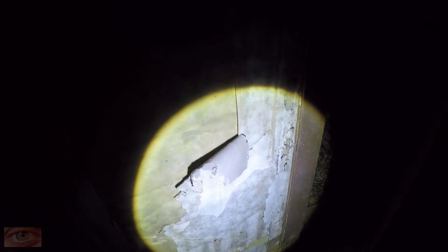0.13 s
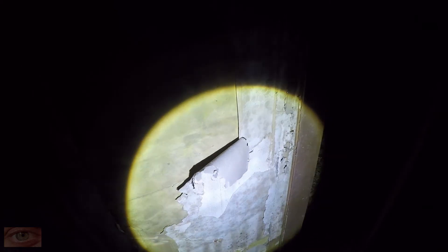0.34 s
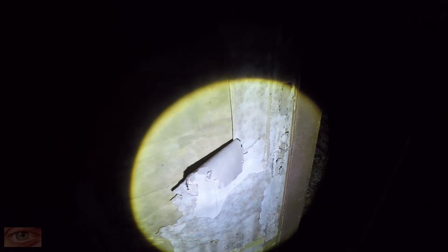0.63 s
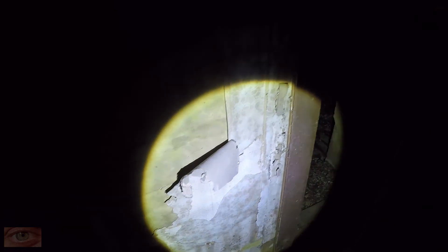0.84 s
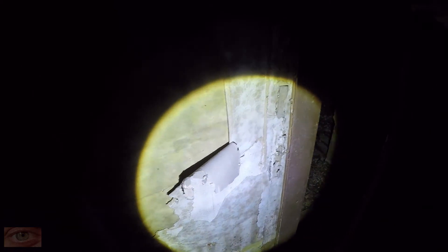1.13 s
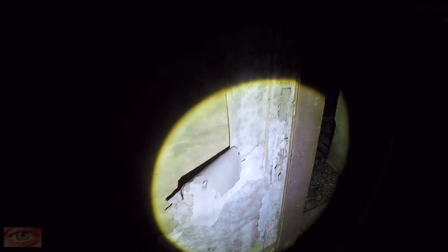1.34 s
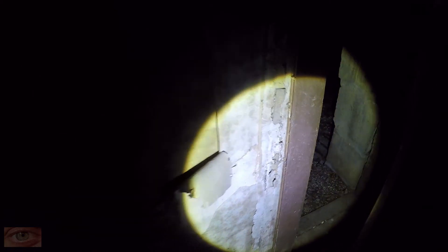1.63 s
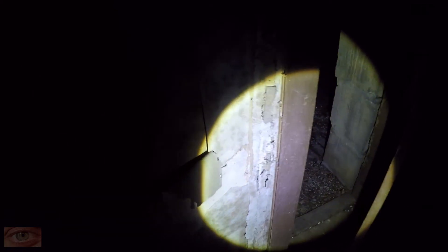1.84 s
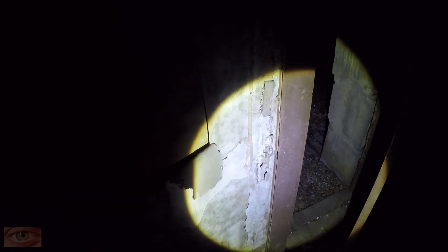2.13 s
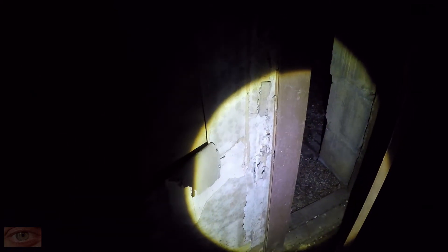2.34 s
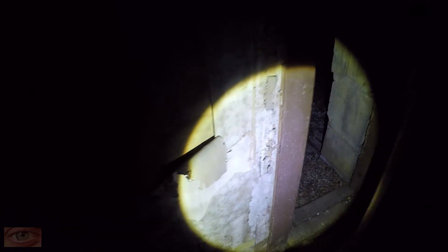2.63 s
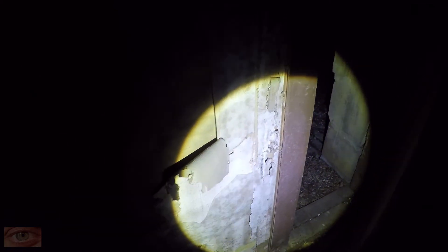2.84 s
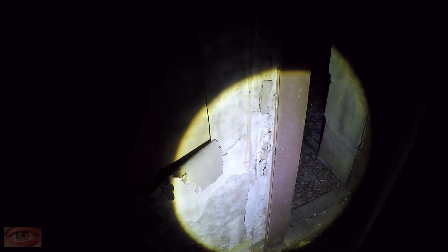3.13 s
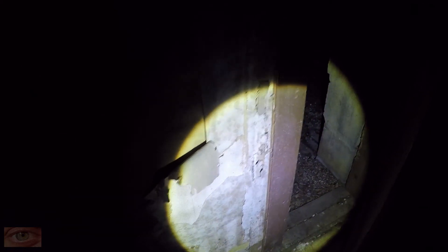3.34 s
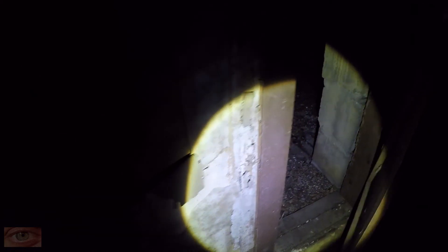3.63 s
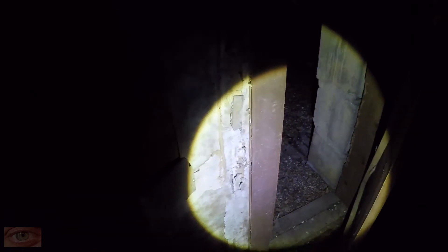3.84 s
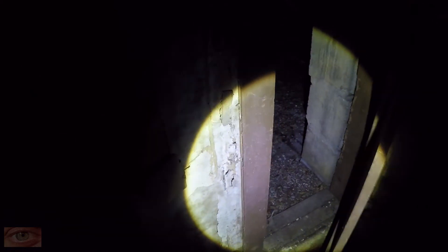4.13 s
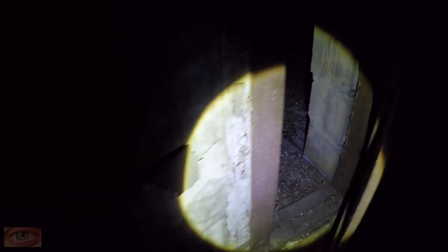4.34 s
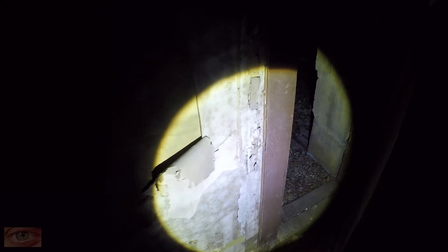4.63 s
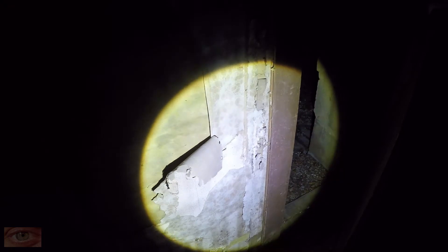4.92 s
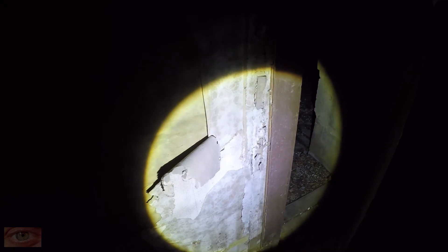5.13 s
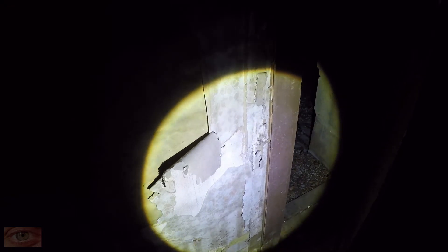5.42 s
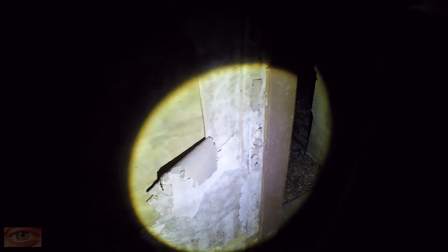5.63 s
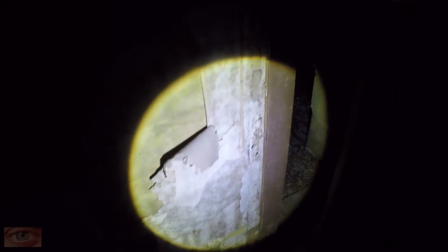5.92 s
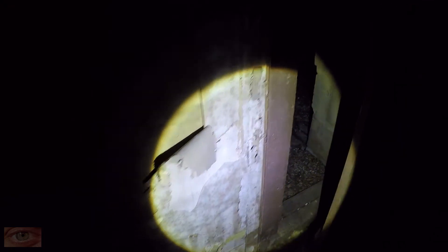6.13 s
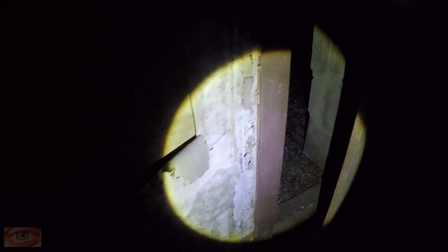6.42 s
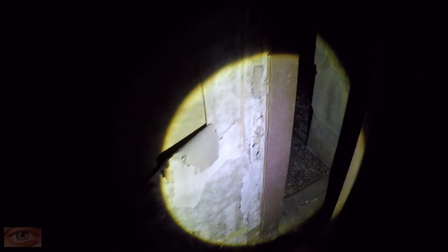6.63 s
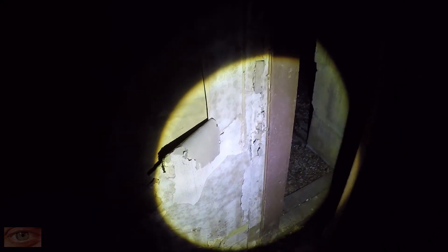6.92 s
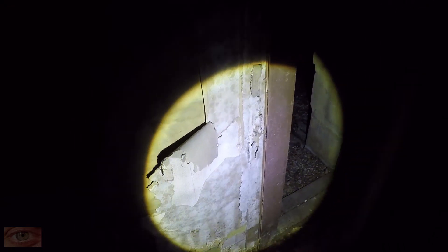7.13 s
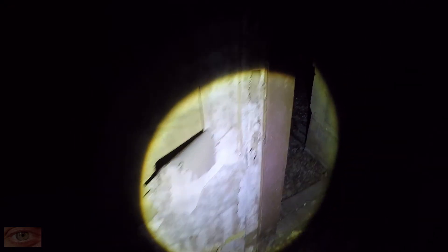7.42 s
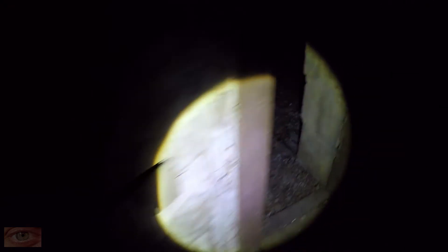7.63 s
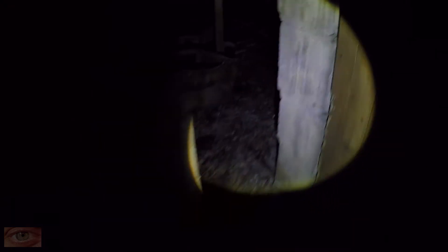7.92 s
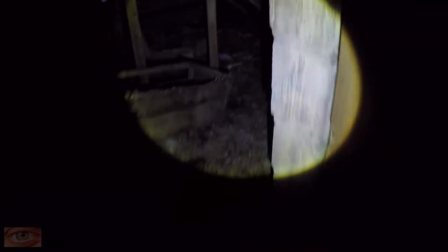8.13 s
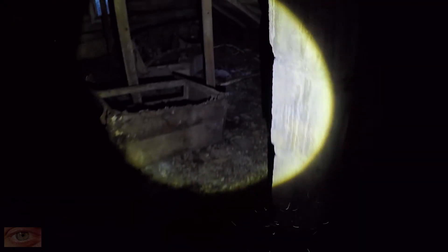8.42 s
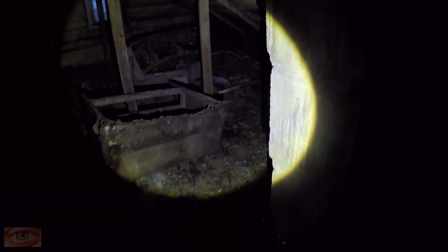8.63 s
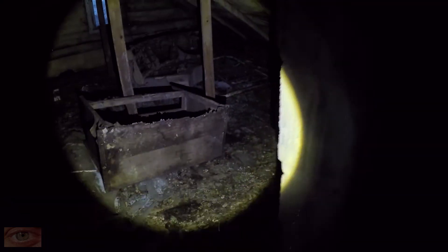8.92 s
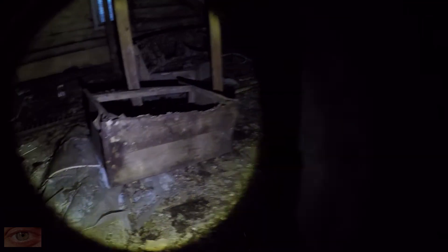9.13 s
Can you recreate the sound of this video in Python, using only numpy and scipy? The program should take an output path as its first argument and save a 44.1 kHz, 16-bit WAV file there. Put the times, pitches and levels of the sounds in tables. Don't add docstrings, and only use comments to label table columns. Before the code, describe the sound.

Close, heavy shoves boom through a jammed wooden door and floor, wood cracks and scrapes, then a last knock gives way to stillness.

```python
import sys
import numpy as np
from scipy import signal
from scipy.fft import rfft, irfft
from scipy.io import wavfile
from scipy.ndimage import uniform_filter1d

SR = 44100
rng = np.random.default_rng(int(sys.argv[2]) if len(sys.argv) > 2 else 0)


def dump(signal):
    limited = np.clip(np.atleast_2d(signal).T, -1, 1)
    pcm = np.round(limited * 32767).astype(np.int16)
    wavfile.write(sys.argv[1], SR, pcm)


def rack_gain(trim_db):
    fader = np.asarray(trim_db, float)
    return 10 ** (fader / 20)


N = 409228
FADE = np.log(1000)


def colour(x, points):
    hz, db = np.transpose(points)
    f = np.maximum(np.fft.rfftfreq(len(x), 1 / SR), 1)
    gain_db = np.interp(np.log(f), np.log(hz), db, left=-80, right=-80)
    y = irfft(rfft(x) * rack_gain(gain_db), len(x))
    return y / np.std(y)


def peak(x):
    return x / np.abs(x).max()


def add(out, s, x):
    i = int(s * SR)
    out[i:i + len(x)] += x[:N - i]


def ring(hz, t60, t):
    return np.sin(2 * np.pi * hz * t) * np.exp(-FADE * t / t60)


def body(modes, weight, weight_db, detune, detune_share, t):
    return sum(rack_gain(db + weight_db * w) * ring(hz * (1 + detune_share * e), t60, t)
               for (hz, db, t60), w, e in zip(modes, weight, detune))


def walk(rate):
    k = int(SR / rate)
    return uniform_filter1d(np.repeat(rng.standard_normal(N // k + 1), k), k)[:N]


def grains(size, rate, spread_db):
    hit = rng.random(size) < rate / SR
    strength = rack_gain(spread_db * np.minimum(rng.exponential(size=size), 4))
    return hit * rng.standard_normal(size) * strength


def crackle(rate, tail_s):
    tail = np.exp(-np.arange(SR // 40) / SR / tail_s)
    return signal.fftconvolve(np.abs(grains(N, rate, 4.0)), tail)[:N]


def hush():
    # (frequency [Hz], density [dB per Hz])
    hush_points = [(12, -21), (20, 17), (38, -7.5), (58, -3), (221, -19), (819, -19), (1690, -24),
                   (1890, -32.5), (5320, -33), (14100, -42.5), (15800, -70)]
    return rack_gain(-46.5) * colour(rng.standard_normal(N), hush_points)


def whines():
    # (time [s], length [s], frequency [Hz], level [dB])
    whine_events = [
        (1.62, 0.34, 1350, -60),
        (6.8, .38, 1130, -64),
        (7.55, .11, 1610, -54),
        (6.84, .1, 420, -55),
        (4.415, .045, 2250, -55),
        (4.47, .055, 3450, -56),
    ]
    t = np.arange(N) / SR
    waver = np.cumsum(1 + 0.02 * walk(40)) / SR
    flutter = rack_gain(3 * walk(38)) * (1 + 0.7 * walk(250))
    lines = np.zeros(N)
    for s, length, hz, db in whine_events:
        fade = np.clip(np.minimum(t - s, s + length - t) / 0.0094, 0, 1)
        lines += rack_gain(db) * fade * np.sin(2 * np.pi * hz * waver)
    return flutter * lines


def slides(s, hold, db, fall_db_s, rest_db):
    bite_db_s = 383
    t = np.arange(0, N, 64)[:, None] / SR
    each = db - bite_db_s * np.maximum(s - t, 0) - fall_db_s * np.maximum(t - s - hold, 0)
    total = np.sqrt(rack_gain(2 * each).sum(axis=1) + rack_gain(2 * rest_db))
    return np.interp(np.arange(N) / SR, t[:, 0], total)


def drag():
    # (time [s], hold [s], grit level [dB], fine dust over grit [dB])
    scrapes = [(0.595, 0.32, -34.5, -12), (0.997, 0.022, -26.5, -10), (1.11, 0.28, -49, -4),
               (1.442, 0.019, -32, -16), (2.034, 0.31, -49, -5), (2.377, 0.16, -34, -11),
               (2.598, 0.15, -33.5, -8.5), (2.801, 0.028, -20, -7), (2.966, 0.092, -37, -15),
               (3.784, 0.2, -45, -13.5), (4.03, 0.15, -40.5, -7.5), (4.255, 0.22, -49, -11.5),
               (4.613, 0.33, -46, -10), (0.52, 0.05, -51, -1), (5.008, 0.46, -42.5, -8.5),
               (5.452, 0.28, -40, -24), (5.92, 0.024, -39, -30), (6.081, 0.24, -43.5, -9.5),
               (6.623, 0.026, -34, -29), (7.126, 0.63, -50, -10.5), (7.83, 0.09, -40, -16),
               (5.763, 0.058, -50, -6), (6.81, 0.26, -52.5, -10.5), (3.655, 0.067, -52.5, -4.5)]
    # (time [s], level [dB])
    weight_shift = [(0.0, -19.5), (0.33, -37.5), (0.57, -15), (1.0, -26), (1.21, -25), (2.2, -32.5),
                    (2.86, -22), (3.92, -29), (4.38, -50), (4.63, -27), (4.88, -21.5), (5.58, -18),
                    (6.55, -35), (6.63, -13), (6.85, -19), (7.18, -35.5), (8.75, -33), (9.28, -44)]
    # (frequency [Hz], density [dB per Hz])
    grit_points = [(170, -13), (260, -7), (340, -3), (600, -5), (1300, -7), (2400, -9), (4500, -17),
                   (7000, -27.5), (9500, -37)]
    # (frequency [Hz], density [dB per Hz])
    dust_points = [(3240, -6), (5500, -5.5), (8370, -15), (10000, -16), (13500, -16.5), (14900, -22),
                   (15800, -20)]
    s, hold, db, fine_db = np.transpose(scrapes)

    grit_gain = slides(s, hold, db, 167.5, -56)
    dust_gain = slides(s, hold, db + fine_db, 167.5, -69)
    slip = 1.1 * walk(30) + 1.2 * walk(150)
    bits = 1 + 0.18 * crackle(70, tail_s=0.004)
    grit = colour(bits * rng.standard_normal(N) + 1.38 * grains(N, 1100, 4.5), grit_points)
    dust = colour(bits * rng.standard_normal(N) + 0.83 * grains(N, 1500, 3.1), dust_points)
    out = grit_gain * rack_gain(slip - 2.0) * grit + dust_gain * rack_gain(0.3 * slip) * dust

    joist_db = np.interp(np.arange(N) / SR, *np.transpose(weight_shift))
    joists = colour(rng.standard_normal(N), [(15, -38.5), (27, 6.0), (40, -5.5), (60, -1.0), (80, -62)])
    out += rack_gain(joist_db - 5.0) * joists

    leaf_gain = slides(s, hold, -1 + 0.77 * db, 40.5, -49)
    leaf = colour(rng.standard_normal(N), [(55, 27.5), (70, -17.0), (110, 1.5), (170, -4.0),
                                           (230, -26.5), (330, -38.5)])
    return out + leaf_gain * rack_gain(0.98 * walk(34) - 7) * leaf


def pieces():
    # (time [s], frequency [Hz],
    # level [dB], t60 [s])
    lath_and_shard_rings = [(0.479, 2460, -34, 0.17), (8.195, 7600, -45, .05), (0.489, 5100, -32, 0.062),
                            (0.491, 1980, -31, 0.085), (1.433, 4970, -25, 0.025), (1.433, 5730, -29, 0.029),
                            (1.433, 6400, -33, 0.027), (1.461, 5100, -30, 0.03), (2.351, 1086, -16.5, 0.036),
                            (2.399, 2050, -9.5, 0.031), (2.432, 6100, -27, 0.025), (2.434, 2900, -14, 0.025),
                            (2.614, 2170, -13, 0.026), (2.614, 5100, -26, 0.028), (2.616, 4050, -21, 0.033),
                            (2.617, 9600, -48, .1), (2.617, 8400, -45, .07), (2.768, 4120, -22, 0.025),
                            (2.78, 6190, -30, 0.15), (2.792, 1220, -14.5, 0.048), (2.802, 4100, -19.5, 0.089),
                            (2.804, 4730, -4.5, 0.025), (2.81, 5710, -21, 0.11), (2.824, 3520, -18, 0.031),
                            (2.828, 2640, -20, 0.04), (2.846, 2970, -15, 0.046), (2.846, 3700, -27, 0.063),
                            (2.893, 5450, -31, 0.036), (2.971, 6890, -44, 0.108), (2.963, 11110, -56, .12),
                            (2.963, 9184, -52, .12), (3.049, 2770, -22.5, 0.038), (3.901, 4710, -34, 0.063),
                            (3.903, 5530, -33, 0.036), (4.27, 3200, -24.5, 0.025), (4.272, 2680, -22, 0.022),
                            (4.578, 1340, -23, 0.038), (4.947, 2660, -24, 0.045), (5.247, 1230, -35, 0.22),
                            (5.247, 1754, -35, 0.19), (5.543, 5000, -30, 0.025), (6.288, 3800, -21, 0.026),
                            (6.29, 5110, -29, 0.06), (6.545, 2080, -33.5, 0.068), (6.689, 1710, -23, 0.027),
                            (7.816, 1770, -22, 0.056), (7.828, 4630, -18, 0.028), (7.858, 1930, -21, 0.027),
                            (7.892, 2680, -16.5, 0.036), (7.892, 5080, -21, 0.038)]
    # (time [s], frequency [Hz], level [dB], t60 [s])
    boards = [(0.501, 943, -31, 0.11), (0.605, 159.4, -25, 0.17), (1.428, 832, -30.5, 0.094),
              (2.395, 460, -40, 0.31), (2.582, 409, -23, 0.1), (2.606, 531, -19.5, 0.105),
              (2.733, 663, -27, 0.091), (2.745, 316, -34, 0.36), (2.791, 905, -28, 0.057),
              (2.892, 147.3, -21, 0.25), (2.892, 342, -22.5, 0.1), (2.983, 428, -29, 0.14),
              (3.064, 208, -34.5, 0.24), (3.195, 876, -37, 0.088), (3.801, 152.4, -31.5, 0.42),
              (4.559, 149, -14, 0.07), (4.575, 621, -31, 0.14), (5.145, 149, -22, 0.07),
              (5.455, 151.2, -17, 0.31), (5.453, 1157, -19, .05), (5.6, 860, -33, .06),
              (5.547, 406, -30, 0.21), (5.937, 314.4, -22, 0.24), (6.195, 417, -37, 0.11),
              (6.44, 770, -48, 0.069), (7.329, 405, -43.5, 0.19), (7.803, 546, -15.5, 0.079),
              (7.885, 217, -15, 0.22), (7.966, 706, -38, 0.07), (7.824, 169, -10.5, 0.17),
              (8.234, 620, -36, 0.035), (2.04, 204.6, -44.5, 0.37)]
    # (time [s], frequency [Hz], level [dB], t60 [s])
    more_rings = [(0.486, 151, -2, 0.066), (1.228, 4400, -42.5, 0.067), (4.131, 198, -32.5, .2),
                  (2.05, 97, -37.5, 0.23), (2.586, 866, -21, 0.17), (2.622, 1334, -23, 0.07),
                  (2.64, 650, -23, 0.078), (4.271, 1720, -28.5, 0.055), (4.296, 2400, -34, 0.076),
                  (4.325, 2200, -52, .15), (4.96, 2280, -25.5, 0.065), (4.968, 3210, -36, 0.1),
                  (5.05, 4450, -34.5, 0.066), (5.052, 3280, -37, 0.093), (5.285, 3280, -38, .1),
                  (5.519, 5870, -39, 0.065), (5.534, 2180, -29, .04), (5.595, 2280, -36, .05),
                  (5.64, 2730, -24, 0.044), (5.655, 3310, -31, 0.034), (6.586, 560, -17, 0.071),
                  (7.258, 1540, -33, 0.03), (7.262, 650, -42, 0.096), (7.805, 202, -10, 0.08),
                  (8.675, 680, -36, 0.058), (7.605, 1560, -37, 0.034), (8.725, 199, -33.5, 0.097),
                  (7.6, 3880, -50, 0.055), (9.055, 1616, -46, 0.047), (9.061, 69.3, -27, 0.16),
                  (9.214, 1857, -34.5, 0.025), (9.214, 2580, -43, 0.039), (9.215, 1160, -43, .03),
                  (2.436, 149, -12.5, 0.12), (4.061, 164, -36.5, .45), (1.002, 3050, -19, .06)]
    out, t = np.zeros(N), np.arange(SR // 3) / SR
    rows = [*lath_and_shard_rings, *boards, *more_rings]
    split, rattle = rng.standard_normal(len(rows)), walk(700)
    for (s, hz, db, t60), e in zip(rows, split):
        t60 = max(t60, 0.015)
        pair = ring(hz, t60, t) + 0.4 * ring(hz * (1 + 0.04 * e), 0.7 * t60, t)
        pair *= 1 + 0.6 * np.roll(rattle, int(s * SR))[:len(t)]
        rise_s = 0.0011 + 1.16 / hz
        add(out, s, rack_gain(db + 2.0) * (1 - np.exp(-t / rise_s)) * pair)
    return out


def clinks():
    # (time [s], frequency [Hz], level [dB])
    shards = [(2.615, 1940, -22.5), (2.649, 8400, -42), (2.651, 5100, -39), (2.652, 10500, -44.5),
              (2.78, 10850, -25.5), (2.9, 7704, -47), (2.918, 9152, -50), (2.8, 14980, -27.5),
              (2.804, 12900, -20.5), (2.847, 8516, -24), (2.847, 5459, -13), (2.847, 10310, -29),
              (2.848, 6783, -19), (2.847, 13660, -17), (2.848, 11850, -29), (2.955, 3246, -44),
              (2.967, 4570, -41.5), (3.062, 6800, -43), (3.089, 3210, -40)]
    # (time [s], frequency [Hz], level [dB])
    loose_parts = [(1.003, 7200, -39), (4.269, 6050, -47), (4.737, 1224, -39), (4.937, 1320, -30),
                   (4.955, 1243, -29), (4.99, 3230, -41), (5.054, 1323, -35), (5.315, 2310, -39),
                   (5.521, 2970, -30), (5.646, 2370, -33), (5.996, 2830, -40), (7.836, 13070, -34),
                   (7.857, 2740, -24.5), (7.887, 1820, -19.5), (7.893, 13000, -37), (7.975, 2420, -36.5),
                   (8.194, 2860, -43.5), (8.195, 5820, -50)]
    # (time [s], frequency [Hz], level [dB], t60 [s])
    latch = [
        (8.195, 4650, -48, 0.065),
        (8.198, 4020, -48.5, 0.055),
        (5.624, 6900, -46, 0.23),
        (2.655, 6191, -43, .3),
        (2.661, 13860, -41, .16),
    ]
    out, t = np.zeros(N), np.arange(SR // 5) / SR
    rows = []
    for s, hz, db in shards + loose_parts:
        t60 = 0.1 * min(7500 / hz, 1) / 2 ** ((db + 31) / 60)
        rows.append((s, hz, db, t60))
    rows += latch
    split = rng.standard_normal(len(rows))
    for (s, hz, db, t60), e in zip(rows, split):
        pair = 0.8 * ring(hz, t60, t)
        pair += 0.45 * ring(hz + 45 + 30 * e, 0.8 * t60, t)
        pair += 0.35 * ring(hz - 80 + 40 * e, 0.6 * t60, t)
        pair += rack_gain(-19.5) * ring(hz + 12 * e, t60, t)
        add(out, s, rack_gain(db + 6.0) * (1 - np.exp(-t / 0.0014)) * pair)
    return out


def planks(hz, weight):
    # (frequency [Hz], width [Hz], lift [dB])
    plank_modes = [(1320, 70, 7), (2350, 110, 6), (3280, 140, 5), (4600, 200, 5)]
    return sum(w * db * np.exp(-((hz - f) / width) ** 2)
               for (f, width, db), w in zip(plank_modes, weight))


def cracks():
    # (time [s], peak [dB], body [dB], sizzle [dB], t60 [s])
    splits = [(0.4793, -17.5, -9.5, -21.5, 0.22), (0.5041, -18, -12, -35, 0.07),
              (1.0002, -2.5, -11.5, -23.5, 0.079), (1.0176, -12.5, -4, -21, 0.061),
              (2.3496, -17, -0.5, -29, 0.16), (2.394, -7.5, -5.5, -34, 0.085), (2.434, -2, 0.5, -28.5, 0.1),
              (2.6156, -14.5, -14, -27.5, 0.097), (2.7666, -14.5, -7, -16, 0.053),
              (2.7907, -12.5, -4.5, -13, 0.25), (2.8052, -7.5, -5, -20, 0.08), (2.8474, -18, 7, -4, 0.061),
              (5.452, -14.5, 1, -30, 0.078), (7.804, -16.5, -4, -30, 0.16),
              (7.8204, -12.5, -43, -21.5, 0.16), (7.8596, -20, -7, -15, 0.14),
              (7.8878, -11.5, -5, -22, 0.15), (8.2318, -41.5, 19.5, -16, 0.089)]
    # (time [s], peak [dB], t60 [s])
    raps = [(0.9109, -23.5, 0.13), (1.3937, -31, 0.06), (2.5701, -20.5, 0.32), (2.9087, -23.5, 0.054),
            (2.9538, -34.5, 0.13), (3.0287, -30, 0.22), (3.1956, -37, 0.1), (3.8392, -31, 0.23),
            (4.1394, -29, 0.11), (5.215, -23, 0.1), (5.5508, -24.5, 0.074), (6.3924, -37, 0.41),
            (6.584, -19.5, 0.14), (6.6911, -25, 0.074), (7.2585, -37.5, 0.074), (8.0466, -40, 0.081),
            (8.678, -42, 0.17)]
    # (time [s], peak [dB], t60 [s])
    snaps = [(0.739, -24.5, 0.032), (0.9428, -19.5, 0.11), (1.4951, -21.5, 0.084), (2.0517, -40.5, 0.076),
             (2.3147, -32, 0.11), (2.9998, -29, 0.18), (3.7289, -30.5, 0.23), (3.894, -19, 0.092),
             (4.3789, -27, 0.1), (4.5452, -27.5, 0.19), (4.57, -18.5, 0.11), (4.7369, -36, 0.11),
             (4.7651, -37, 0.26), (4.9384, -21, 0.13), (4.953, -26.5, 0.092), (5.1507, -28.5, 0.14),
             (5.247, -21, 0.24), (5.4186, -29, 0.069), (5.5224, -21.5, 0.19), (5.5821, -27, 0.16),
             (5.65, -27, 0.053), (5.9359, -29, 0.051), (5.9642, -27.5, 0.11), (5.996, -33, 0.14),
             (6.2752, -25, 0.21), (6.546, -31.5, 0.15), (9.2139, -40, 0.086)]
    # (time [s], peak [dB], t60 [s])
    splinters = [(0.602, -31, 0.32), (1.2276, -51, 0.063), (1.432, -31, 0.044), (1.4655, -22, 0.11),
                 (3.047, -15.5, 0.062), (4.2712, -25.5, 0.14), (4.2935, -52, 0.12), (5.0514, -27.5, 0.12),
                 (5.3075, -27, 0.069), (5.3672, -28, 0.11), (5.6242, -17.5, 0.047), (6.2888, -19, 0.11),
                 (6.6265, -28, 0.28), (7.95, -23.5, 0.15), (8.1945, -38, 0.087), (8.3, -44, 0.091)]
    kinds = (raps, 1.5, -27), (snaps, -6.5, -29), (splinters, -15, -26)
    breaks = list(splits)
    for rows, body_db, sizzle_db in kinds:
        breaks += [(s, db, body_db, sizzle_db, t60) for s, db, t60 in rows]
    breaks.sort()

    out, t = np.zeros(N), np.arange(8192) / SR
    hz = np.geomspace(200, 15500, num=128)
    tilt_hz = [200, 320, 800, 1600, 4000, 7000, 15500]
    ripple = rng.standard_normal((len(breaks), len(hz)))
    for (s, db, body_db, sizzle_db, t60), r in zip(breaks, ripple):
        uneven = np.interp(t, np.linspace(0, t[-1], num=40), rng.standard_normal(40))
        stutter = rack_gain(2.5 * np.minimum(t / 0.012, 1) * uneven)
        swarm = stutter * (rng.standard_normal(len(t)) + 1.5 * grains(len(t), 2500, 3.2))

        tilt_db = [body_db - 7.5, body_db + 11.0, body_db + 7.0, 0, -4, sizzle_db + 9.5, sizzle_db - 5.5]
        tilt = np.interp(np.log(hz), np.log(tilt_hz), tilt_db)
        wood_db = tilt + 2.8 * r + planks(hz, 0.5 + 0.3 * r[:4])
        snap = colour(swarm, np.c_[hz, wood_db])
        dull = uniform_filter1d(snap, size=9)
        snap = dull + (snap - dull) * np.exp(-FADE * t / 0.23)

        t60 = max(t60, 0.02)
        decay = np.exp(-FADE * t / t60) + 0.13 * np.exp(-FADE * t / (2.3 * t60))
        shape = (1 - np.exp(-t / (0.048 * t60))) * decay
        shape += 0.5 * (1 - np.exp(-t / 0.00019)) * np.exp(-t / 0.0014)
        whole = np.sqrt(1 + rack_gain(2 * body_db) + rack_gain(2 * sizzle_db))
        add(out, s, rack_gain(db - 2.5) * whole * snap * shape)
    return out


def knocks():
    # (time [s], peak [dB])
    frame_blows = [(0.485, -11), (1.002, -4.5), (2.431, -29), (5.454, -13), (5.933, -11.5), (6.276, -7),
                   (6.459, -25), (6.586, -7.5), (6.715, -18.5), (7.803, -5), (7.95, -16.5), (8.234, -10),
                   (8.674, -25.5), (2.05, -39)]
    # (frequency [Hz], level [dB], t60 [s])
    frame_modes = [(171.5, -3.5, 0.28), (300, -5.5, 0.22), (322.8, -2.5, 0.12), (391, -10.5, 0.21),
                   (419, -8.5, 0.21), (534.6, -16, 0.16), (612.4, -7, 0.13), (650, -33, 0.14)]
    free_s, panel_stuck_db, panel_free_db = 7.5, -22.5, -1
    out, t = np.zeros(N), np.arange(SR // 2) / SR
    panel = ring(251, 0.13, t)
    chance = rng.standard_normal((len(frame_blows), 2, len(frame_modes)))
    for (s, db), (weight, detune) in zip(frame_blows, chance):
        panel_db = panel_free_db if s > free_s else panel_stuck_db
        frame = body(frame_modes, weight, 2.0, detune, 0.0094, t)
        frame = peak(frame * (1 - np.exp(-t / 0.0029)))
        add(out, s, rack_gain(db - 5.5) * (frame + rack_gain(panel_db) * panel))
    return out


def thumps():
    # (time [s], peak [dB], pitch of struck spot [Hz], joist boom [dB], ring t60 [s])
    shoves = [(0.477, -6, 145, -9.5, 0.18), (0.521, -8.5, 65.4, -10, 0.11), (0.903, -7, 131, -28, 0.2),
              (1, -2, 103, -15, 0.11), (1.486, -9.5, 78.4, -7.5, 0.13), (2.35, -12, 83.5, -11, 0.36),
              (2.392, -5.5, 64, -27, 0.11), (2.433, -6.5, 94.5, -3, 0.23), (2.795, -5, 104.3, -27, 0.091),
              (2.839, -11, 165, -5, 0.15), (4.56, -4, 66, -0.5, 0.047), (4.944, -11, 96, -19, 0.11),
              (5.24, -3.5, 65.6, -4.5, 0.042), (5.456, -13, 82, -7, 0.39), (5.517, -10, 80, 1, 0.087),
              (6.27, -8, 155.6, -22, 0.14), (6.583, -2.5, 63.3, -6, 0.061), (6.706, -14, 120, 2, 0.077),
              (6.762, -17, 35.5, -23, 0.26), (7.801, -6, 100, -24, 0.073), (7.861, -11.5, 104, -21, 0.027),
              (7.92, -8.5, 61.7, -11.5, 0.07), (8.235, -22, 70, -31, 0.25)]
    # (time [s], peak [dB], joist boom [dB])
    bumps = [(0.678, -17, -0.5), (2.301, -21, -17), (3.738, -26, 1), (3.845, -19.5, -3.5),
             (3.898, -22.5, -3), (4.139, -26.5, -12), (5.151, -21.5, -7), (5.643, -23, 11),
             (5.935, -16, -4), (6.083, -24.5, -3), (6.458, -22, -3.5), (8.665, -25, -2), (9.217, -28.5, 6)]
    # (frequency [Hz], level [dB], t60 [s])
    leaf_modes = [(59.6, -18.5, 0.24), (83, -0.5, 0.14), (99.1, -5, 0.3), (137.1, -9, 0.28),
                  (172.1, -1.5, 0.14), (194.6, -10.5, 0.19), (233, -27, 0.19)]
    # (frequency [Hz], level [dB], t60 [s])
    joist_modes = [(25.33, -4, 0.36), (29.7, -8, 0.3), (35.8, -7, 0.68), (51.9, -6.5, 0.42)]
    bump_hz, bump_t60_s = 82.8, 0.037
    blows = sorted([*shoves, *((s, db, bump_hz, boom_db, bump_t60_s) for s, db, boom_db in bumps)])
    out, t = np.zeros(N), np.arange(2 * SR // 3) / SR
    chance = rng.standard_normal((len(blows), 2, len(leaf_modes)))
    for (s, db, hz, boom_db, t60), (weight, detune) in zip(blows, chance):
        spot = (np.exp(-(2.05 * hz * t) ** 2) - 1) * ring(hz, t60, t)
        leaf = body(leaf_modes, weight, 3.0, detune, 0.04, t)
        leaf *= np.exp(-t / 0.02) - 1
        boom = body(joist_modes, weight[::-1], 2.4, detune, 0.029, t)
        boom *= np.exp(-t / 0.043) - 1
        add(out, s, rack_gain(db) * (peak(spot) + rack_gain(-5.0) * peak(leaf) + rack_gain(boom_db) * peak(boom)))
    return out


def room(x):
    # (frequency [Hz], t60 [s])
    room_bands = [(90, 0.8), (250, 0.45), (1000, 0.18), (4000, 0.11), (12000, 0.27)]
    t = np.arange(SR) / SR
    tail = np.zeros(SR)
    for hz, t60 in room_bands:
        band = colour(rng.standard_normal(SR), [(hz / 3, -20), (hz, 0), (hz * 3, -20)])
        tail += band * np.sqrt(hz / t60) * np.exp(-FADE * t / t60)
    tail *= t > 0.006
    return signal.fftconvolve(x, tail / np.sqrt(np.sum(tail ** 2)))[:N]


def scene():
    background = hush() + whines() + drag()
    loose = pieces()
    high = cracks() + clinks()
    low = thumps() + knocks()
    echoes = room(rack_gain(-12.5) * low + rack_gain(-26.5) * high) + room(rack_gain(-11.5) * loose)
    return (background + loose + high + low + echoes)[None]


def top_cut(x):
    return signal.sosfilt(signal.butter(12, 16040, fs=SR, output="sos"), x)


def record(dry):
    x = signal.sosfilt(signal.butter(2, 17, "high", fs=SR, output="sos"), dry)
    x = x / (1 + x ** 8) ** 0.125
    x = signal.sosfilt(signal.ellip(8, 0.3, 50, 15300, fs=SR, output="sos"), x)
    mix = 0.94 * x
    return top_cut(mix)


dry = scene()
out = record(dry)
dump(out)
```